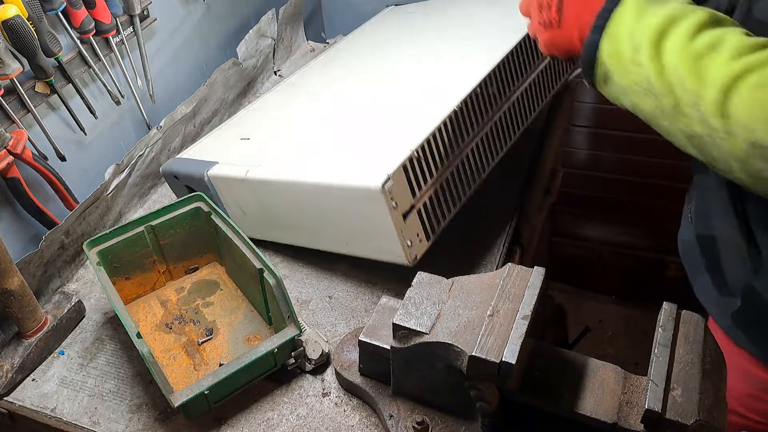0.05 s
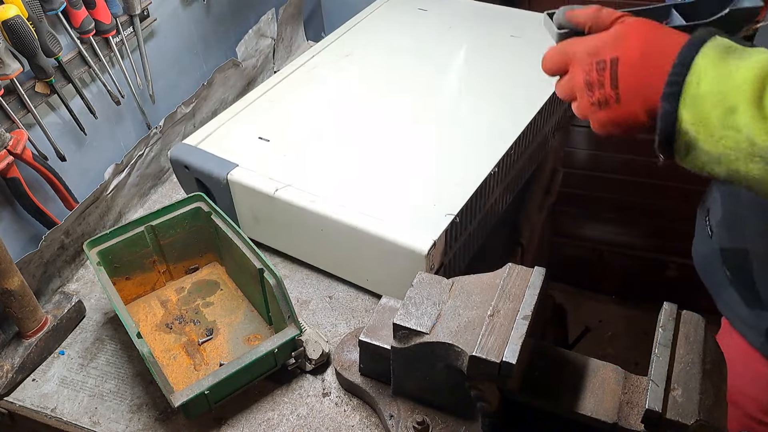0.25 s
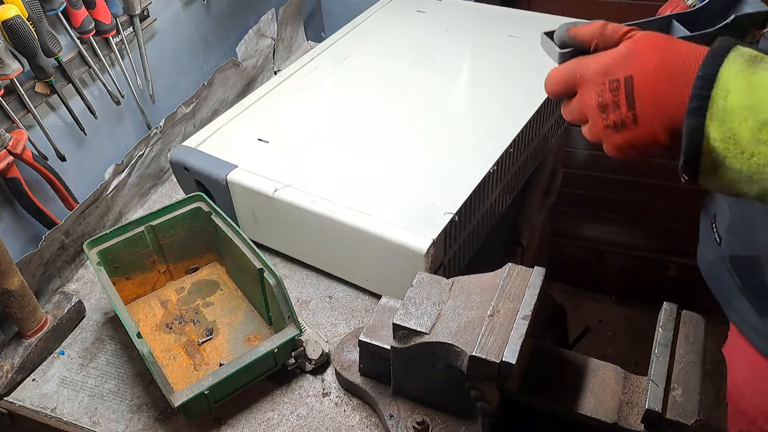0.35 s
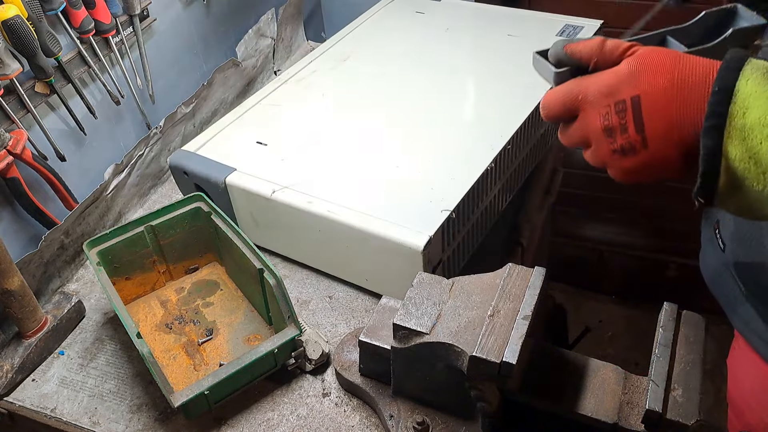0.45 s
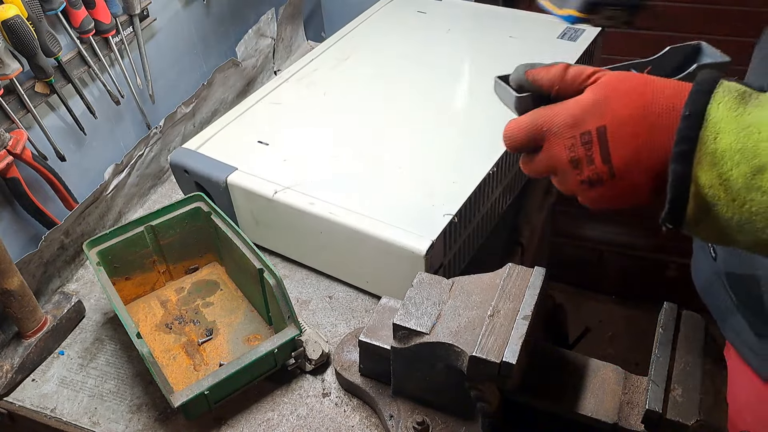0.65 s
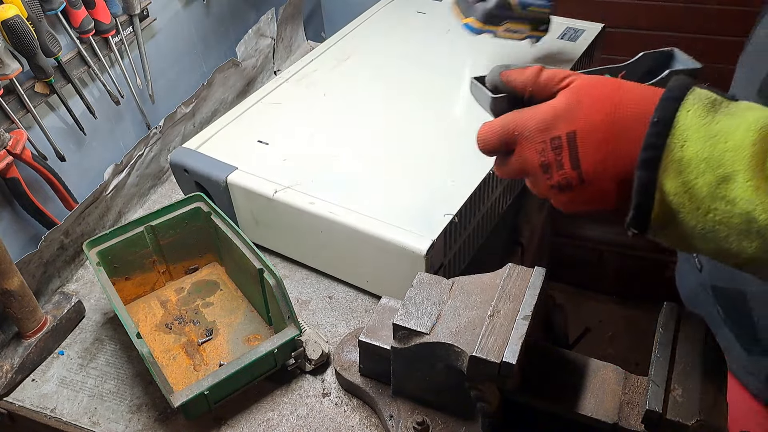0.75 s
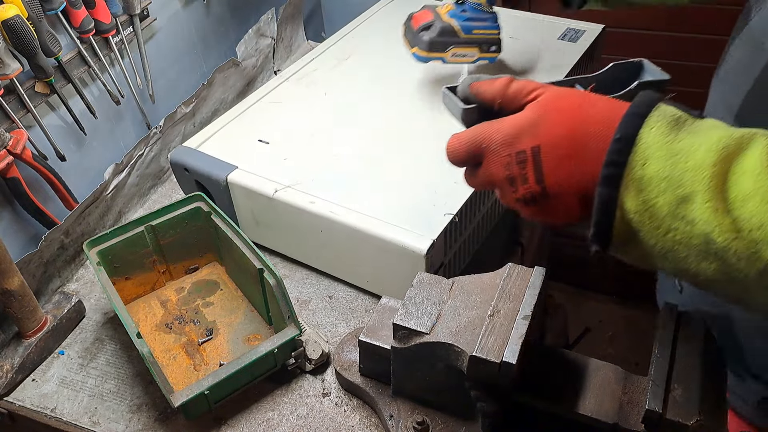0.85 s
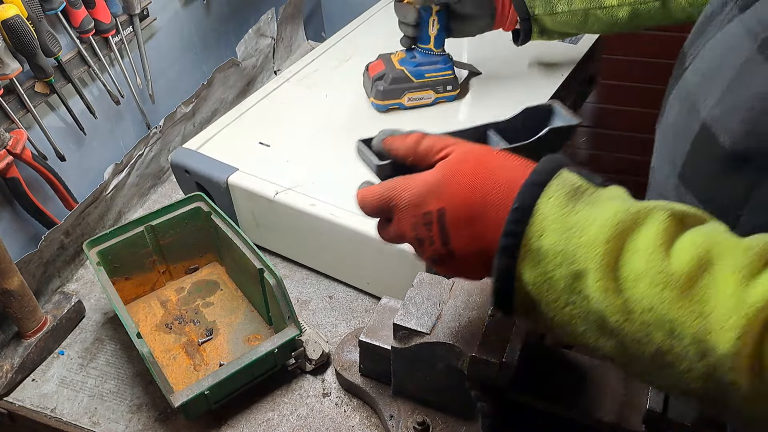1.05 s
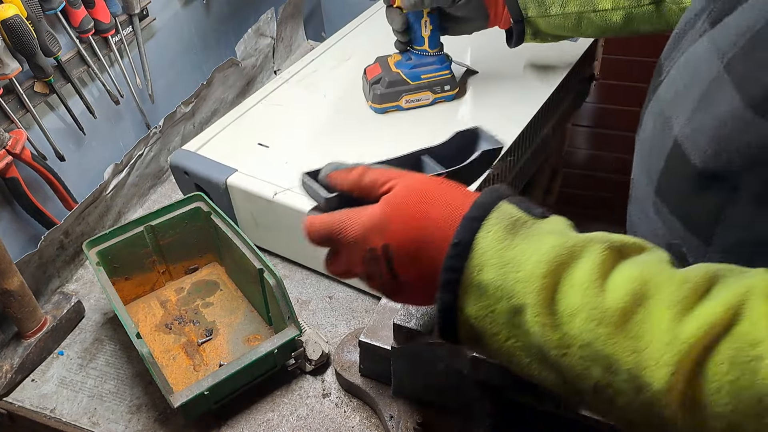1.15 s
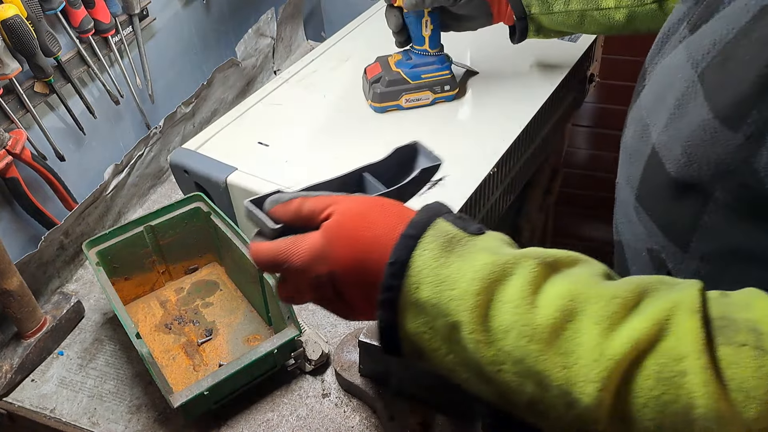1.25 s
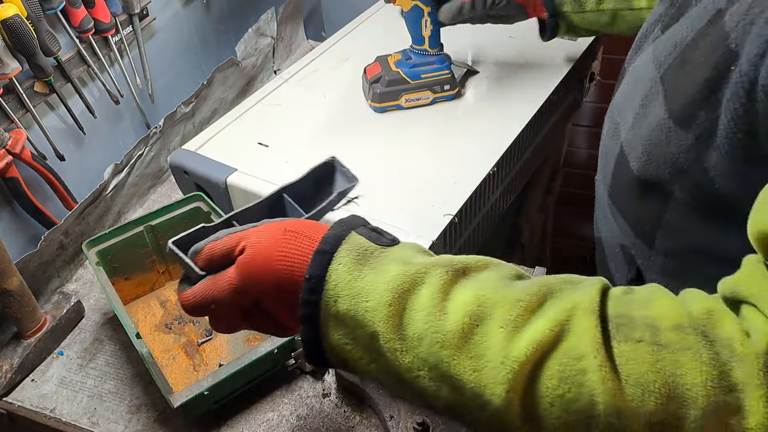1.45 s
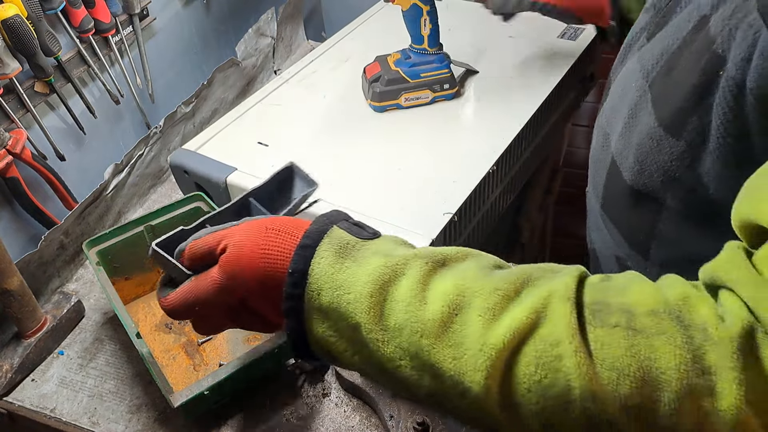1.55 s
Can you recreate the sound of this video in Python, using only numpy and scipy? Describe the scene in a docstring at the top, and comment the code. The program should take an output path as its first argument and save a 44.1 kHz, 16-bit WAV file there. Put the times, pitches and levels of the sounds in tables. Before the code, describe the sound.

A metal casing scrapes, drops onto a workbench with a clang and rattles to rest.

```python
"""Metal edges scrape and squeal as a sheet-metal heater casing slides, then drops onto a workshop bench
and rocks to rest; a cordless drill is stood on its lid with two hollow knocks, and a last scrape follows.
Every blow makes loose panels chatter and rings the same casing: a few low panel modes under a dense clang.
The bench thumps under the weight, and a small room answers."""
import sys
import numpy as np
from scipy import signal
from scipy.fft import rfft, irfft
from scipy.io import wavfile

SR = 44100
rng = np.random.default_rng(int(sys.argv[2]) if len(sys.argv) > 2 else 0)


def generate_wav(sig):
    """Save sig (samples, or channels by samples) to the path in sys.argv[1] as 16-bit PCM at SR."""
    pcm = np.round(np.clip(np.atleast_2d(sig).T, -1, 1) * 32767).astype(np.int16)
    wavfile.write(sys.argv[1], SR, pcm)


N = 70560
TIME_S, BINS_HZ = np.arange(N) / SR, np.arange(N // 2 + 1) * SR / N


def undb(db):
    """Decibels to gain."""
    return 10 ** (np.asarray(db) / 20)


def unit(x):
    """Scale to energy 1."""
    return x / np.sqrt(np.sum(x ** 2, axis=-1, keepdims=True) + 1e-18)


def decay(t, t60_s):
    """Fall of 60 dB per t60_s."""
    return np.exp(-np.log(1000) * t / t60_s)


def sides(db=5):
    """Stereo gains, left louder by db."""
    return undb(np.array([[db], [-db]]) / 2)


def lookup(hz, table, column=1):
    """Interpolate a column over log frequency."""
    table = np.array(table, float)
    return np.interp(np.log(np.maximum(hz, 1)), np.log(table[:, 0]), table[:, column])


def colour(x, points, size=4096):
    """Minimum-phase filter through (f/Hz, gain/dB) points."""
    gain = undb(lookup(np.arange(size // 2 + 1) * SR / size, points))
    cepstrum = irfft(np.log(gain))
    cepstrum[1:size // 2] *= 2
    cepstrum[size // 2 + 1:] = 0
    return signal.fftconvolve(x, irfft(np.exp(rfft(cepstrum))))[:len(x)]


def noise_pair(spectrum):
    """Two independent shaped noises, RMS 1."""
    return np.sqrt(N) * unit(irfft(rfft(rng.standard_normal((2, N))) * spectrum, N))


def add(out, x, start_s):
    """Mix stereo x in at start_s."""
    i = int(round(start_s * SR))
    x, i = x[:, max(-i, 0):], max(i, 0)
    out[:, i:i + x.shape[1]] += x[:, :max(N - i, 0)]


def mode(hz, db, t60_s, rise_s=0.0038):
    """One resonance that swells and dies away."""
    envelope = decay(TIME_S, t60_s) * (1 - np.exp(-TIME_S / rise_s))
    return undb(db) * np.sin(2 * np.pi * hz * TIME_S) * envelope * sides()


# room air spectrum: f/Hz, relative level/dB
AIR_SPECTRUM = [(100, -12), (400, -20), (2000, -58), (16000, -41)]
def air(rms_db=-58.5):
    """Faint dull background of the workshop."""
    noise = np.array([colour(rng.standard_normal(N), AIR_SPECTRUM) for _ in range(2)])
    return undb(rms_db) * np.sqrt(N) * unit(noise)


def sing(length_s, hz, db, relative_width):
    """A rough, narrow resonance that swells and fades."""
    tone = noise_pair(np.exp(-.5 * ((BINS_HZ / hz - 1) / relative_width) ** 2))
    swell = np.sin(np.pi * np.minimum(TIME_S / length_s, 1))
    return undb(db) * tone * swell * sides()


# edge squeals: t/s, length/s, f/Hz, level/dB
SQUEALS = [(-.04, 0.2, 479, -43.5), (.14, .11, 1280, -41), (.236, 0.017, 1320, -26),
           (.234, 0.023, 6840, -29)]
# high squeaks: t/s, length/s, level/dB
SQUEAKS = [(.768, 0.059, -48), (.977, 0.043, -49)]
def squeals(squeak_hz=14800):
    """A skidding edge briefly sings; later come two thin squeaks."""
    out = np.zeros((2, N))
    for start_s, length_s, hz, db in SQUEALS:
        add(out, sing(length_s, hz, db, relative_width=0.066), start_s)
    for start_s, length_s, db in SQUEAKS:
        add(out, sing(length_s, squeak_hz, db, relative_width=0.0043), start_s)
    return out


def flex(start_s=.628, length_s=0.1306, from_hz=260.3, to_hz=161, db=-30):
    """The bent lid relaxes, so its note slides down."""
    progress = np.clip((TIME_S - start_s) / length_s, 0, 1)
    hz = from_hz + (to_hz - from_hz) * progress
    phase = 2 * np.pi * np.cumsum(hz * (progress > 0)) / SR
    swell = np.sqrt(np.abs(np.sin(np.pi * progress)))
    return undb(db) * swell * np.sin(phase) * sides()


# bench and casing notes: t/s, f/Hz, level/dB, t60/s
THUMPS = [(.274, 132.7, -11, 0.16), (0.372, 70.7, -29, 0.43), (0.565, 74, -31, 0.72),
          (0.857, 73.7, -32.5, 1), (1.09, 125.3, -19.5, 0.11), (1.125, 68.7, -31.5, 0.83),
          (1.481, 342, -38.5, 0.24)]
def thumps():
    """Bench top and casing give a low note as the weight comes down."""
    out = np.zeros((2, N))
    for start_s, hz, db, t60_s in THUMPS:
        add(out, mode(hz, db, t60_s, rise_s=0.0074), start_s)
    return out


# drill body modes: f/Hz, relative level/dB, t60/s
DRILL_MODES = [(265, -2.5, 0.18), (601.7, 2.5, 0.13), (690, -3.5, 0.089), (1091, -8.5, 0.31)]
# battery on lid: t/s, level/dB
DRILL_KNOCKS = [(.974, -20.5), (1.087, -23.5)]
def drill():
    """The plastic battery foot knocks hollowly on the lid twice, the second knock softer."""
    out = np.zeros((2, N))
    for start_s, knock_db in DRILL_KNOCKS:
        add(out, sum(mode(hz, knock_db + db, t60_s) for hz, db, t60_s in DRILL_MODES), start_s)
    return out


def ripple(depth_db=3, spacing_hz=40, full_above_hz=700):
    """The casing favours some of its close modes, the same for every contact."""
    knots = rng.standard_normal(N // 16)
    peaks = np.interp(BINS_HZ / spacing_hz, np.arange(len(knots)), knots)
    return undb(depth_db * np.minimum(BINS_HZ / full_above_hz, 1) * peaks)


# casing and room spectrum: f/Hz, relative density/dB
CLANG_SPECTRUM = [(30, -20), (65, 0), (130, 0), (300, 7.5), (420, 1), (620, 8), (1000, 3), (2000, 0.5),
                  (4000, -3.5), (6400, -8.5), (8200, -17.5), (10500, -17.5), (12500, -14.5), (16000, -25.5)]
# ring by register: f/Hz, t60/s, stereo coherence/0-1, left minus right/dB
CLANG_REGISTERS = [(60, 0.98, 0.88, 2.5), (256, 0.66, 1, 5), (600, 0.59, 0.3, 2.5), (1550, 0.47, 0.15, 4),
                   (5430, 0.26, 0.12, 5.5), (11800, 0.21, 0, 1)]
def clang_bands(gain_db=17.5, ring_s=.55, crack_db=5, crack_s=0.0016, crack_hz=3230):
    """Countless close modes and room echoes as half-octave noises, each with its decay."""
    t = TIME_S[:int(ring_s * SR)]
    body = ripple() * undb(gain_db + lookup(BINS_HZ, CLANG_SPECTRUM))
    noises, decays = [], []
    for hz in 32 * 2 ** np.arange(0, 9.1, .5):
        half_octaves = 2 * np.log2((BINS_HZ + 1) / hz)
        band = np.cos(np.pi / 2 * np.clip(half_octaves, -1, 1)) * body
        t60_s, coherence, pan_db = (lookup(hz, CLANG_REGISTERS, column) for column in (1, 2, 3))
        mid, side = np.sqrt(np.mean(band ** 2)) * noise_pair(band)
        stereo = np.sqrt((1 + coherence) / 2) * mid + np.sqrt((1 - coherence) / 2) * np.array([side, -side])
        noises.append(stereo * sides(pan_db))
        crack = undb(crack_db) * hz / (hz + crack_hz) * np.exp(-t / crack_s)  # treble starts above its tail
        decays.append(unit(decay(t, t60_s) + crack))
    return np.array(noises, np.float32), np.array(decays, np.float32)


def clang(push, points, bands):
    """A push feeds energy into the close modes, which lose it band by band."""
    noises, decays = bands
    size = decays.shape[1]
    spot = rng.integers(N - size)  # each spot wakes its own mixture
    energy = signal.fftconvolve(np.float32(push[None] ** 2), decays ** 2, axes=1)[:, :size]
    envelopes = np.sqrt(np.maximum(energy, 0))
    ring = np.einsum("bct,bt->ct", noises[:, :, spot:spot + size], envelopes)
    return np.array([colour(channel, points) for channel in ring])


def grit(spread, size):
    """Dense tiny contacts of uneven strength."""
    push, strength = rng.standard_normal((2, size))
    return push * np.exp(spread * np.minimum(strength, 2))


def contact(db, thud_db, clang_db, treble_db):
    """Weight and hardness of a contact as (f/Hz, gain/dB) points."""
    points = [(140, thud_db), (224, 0), (590, 0), (1350, clang_db), (2550, clang_db), (9400, treble_db)]
    return [(hz, db + offset_db) for hz, offset_db in points]


# light touch: t/s, level/dB
TICKS = [(0.0818, -10.5)]
# its spectrum: f/Hz, gain/dB
TICK_COLOUR = [(200, -10), (1500, -21.5), (5000, -4), (15000, 9)]
def ticks(bands):
    """A small hard touch of metal, mostly treble."""
    out = np.zeros((2, N))
    for start_s, db in TICKS:
        add(out, clang(undb([db]), TICK_COLOUR, bands), start_s)
    return out


# sliding edges: t/s, length/s, level/dB, then re level: thud/dB, clang/dB, treble/dB
SCRAPES = [(-.06, 0.13, -14, -8, -7.5, -8), (0.082, 0.098, -9, 7, -7.5, 3),
           (0.131, 0.16, -8, -4, -0.5, -2.5), (0.814, 0.072, -13, -30, -4, -10),
           (1.418, 0.049, -21, -4, 2, 6.5)]
def scrapes(bands):
    """A sliding edge catches on grit, swelling and fading."""
    out = np.zeros((2, N))
    for start_s, length_s, *contact_db in SCRAPES:
        catches = grit(spread=0.37, size=8192)
        progress = np.minimum(TIME_S[:len(catches)] / length_s, 1)
        swell = np.sqrt(np.abs(np.sin(np.pi * progress)))
        add(out, clang(unit(catches * swell), contact(*contact_db), bands), start_s)
    return out


# panel modes: f/Hz, relative level/dB
PANEL_MODES = [(166, -11), (246, -6), (266, -8), (288, 0.5), (338, -2.5), (408, -5.5), (453, -5),
               (489, -8.5), (604, -7.5), (658, -9), (776, -15), (965, -9.5), (1083, -9.5), (1423, -10.5)]
def panels(gain_db=-24.5, spread_db=1.66, pitch_spread=.016):
    """The large panels boom; each blow strains them differently, shifting pitches and strengths."""
    out = np.zeros((2, N))
    for hz, db in PANEL_MODES:
        strain, spot = rng.standard_normal(2)
        t60_s = .42 * (300 / hz) ** 0.58  # higher modes die sooner
        out += mode(hz * (1 + pitch_spread * strain), gain_db + db + spread_db * spot, t60_s)
    return out


# casing blows: t/s, level/dB, thud/dB, clang/dB, treble/dB, boom/dB (these four re level), chatter/s
BLOWS = [ (0.235, -7, -10, -0.5, 9, -18, 0.0092), (0.2525, -6.5, 11.5, 3, 12.5, -14, 0.0037),
         (0.272, 1, 6, 0.5, -3.5, -18, 0.00083), (0.28, -5, 8, 1.5, 5.5, -15, 0.0018),
         (0.291, -7, 11, 5.5, 13.5, -10, 0.0032), (0.308, -0.5, 5, -11, -22, 5, 0.005),
         (0.322, -3, -3.5, 4.5, 3.5, 2, 0.0011), (0.359, -1.5, 7, -4.5, -2.5, 3, 0.0042),
         (0.375, -2, -6, -2, -2, 7.5, 0.025), (0.419, -2, 4.5, -2, -4.5, 4, 0.0064),
         (0.489, -9, 10, 2.5, 4, 5.5, 0.0079), (0.549, -9, -10, 0.5, -2.5, 5, 0.004),
         (0.6, -11, 14.5, -2, -3, 7.5, .008), (0.641, -4.5, -19, 0.5, -1, 0.5, 0.006),
         (0.677, -7, 3, -6, -7.5, 4, 0.014), (0.723, -9, 5, 2, 1, 3.5, 0.0043),
         (.756, -11.5, 12, -4, -1, 1.5, 0.029), (0.906, -11, 3, -2, -6.5, 1, 0.021),
         (0.973, -2.5, -21, -2.5, -15.5, -3, 0.0099), (0.98, -5, -30, -5.5, -8.5, -1.5, 0.021),
         (1.039, -9, -4, -1, -6.5, 0, 0.082), (1.096, 0.5, -1.5, -7.5, -1.5, -3, 0.016),
         (1.146, -10.5, 13, 1.5, -0.5, 8.5, 0.021), (1.19, -5.5, -12, -4.5, -5, -5, 0.029),
         (1.238, -17.5, 4, 0.5, -2, -5, 0.0034), (1.311, -24, -16, 4, 5, -10.5, 0.0059),
         (1.41, -18, 9, -7, -6, -5, 0.0034)]
def blows(bands, chatter_db=12, damped_from_s=1.18, damping_t60_s=0.43):
    """Each blow booms the panels and clangs the casing, with a dying chatter of loose parts."""
    clangs, booms = np.zeros((2, N)), np.zeros((2, N))
    for start_s, db, thud_db, clang_db, treble_db, boom_db, chatter_s in BLOWS:
        chatter = grit(spread=0.82, size=4096)
        fade = np.exp(-.5 * (TIME_S[:len(chatter)] / chatter_s) ** 2)
        push = undb(chatter_db) * unit(chatter * fade)
        push[0] = 1  # first contact
        add(clangs, clang(unit(push), contact(db, thud_db, clang_db, treble_db), bands), start_s)
        add(booms, undb(db + boom_db) * panels(), start_s)
    loaded_s = np.maximum(TIME_S - damped_from_s, 0)  # the drill's weight damps the panels
    return clangs + booms * decay(loaded_s, damping_t60_s)


def scene(right_lag_s=.00012):
    """One casing, a little to the left, over the room air."""
    bands = clang_bands()
    left, right = blows(bands) + scrapes(bands) + ticks(bands) + thumps() + squeals() + drill() + flex()
    right = np.pad(right, (int(right_lag_s * SR), 0))[:N]
    return np.array([left, right]) + air()


def record(dry, top_hz=15900):
    """Steep low-pass on the top treble."""
    return signal.sosfilt(signal.ellip(10, .2, 80, top_hz, fs=SR, output="sos"), dry)


dry = scene()
out = record(dry)
generate_wav(out)
```